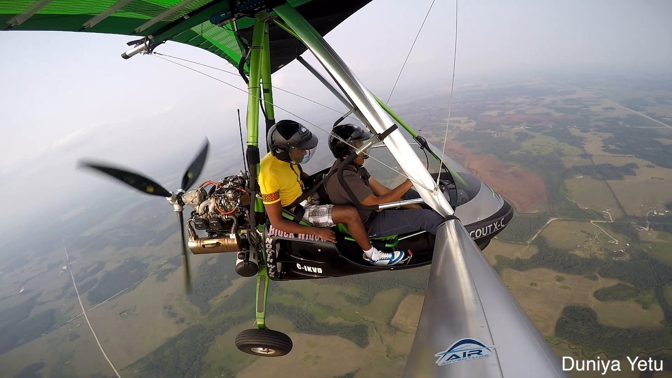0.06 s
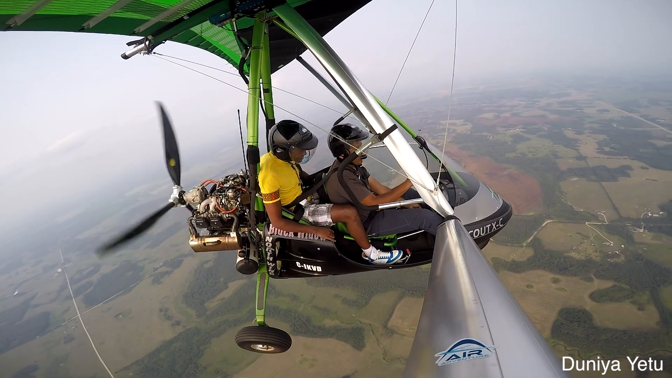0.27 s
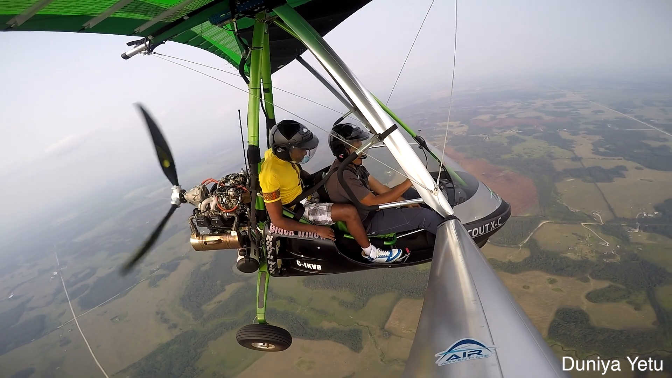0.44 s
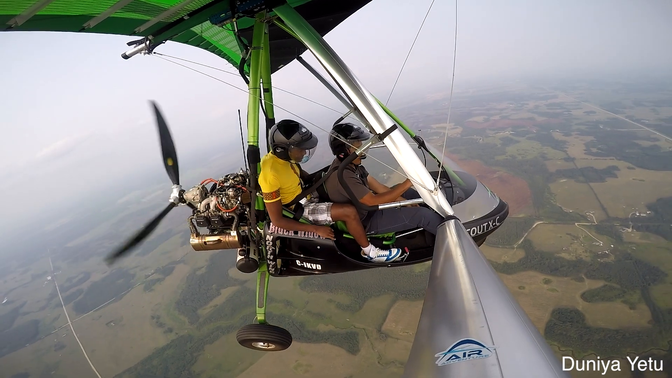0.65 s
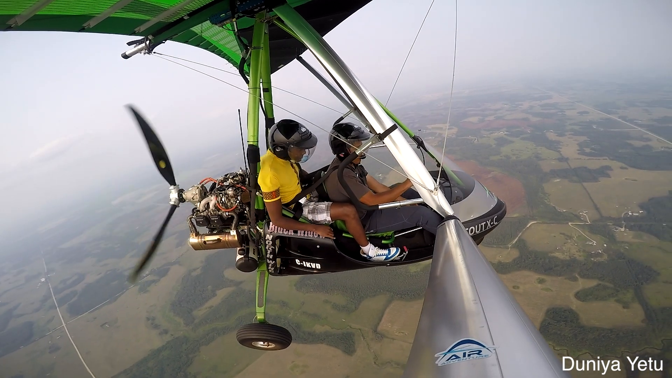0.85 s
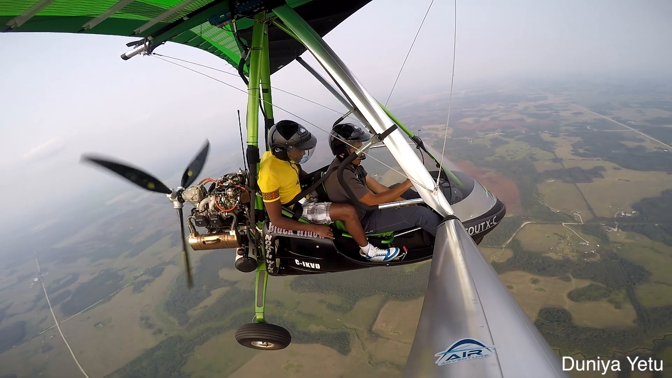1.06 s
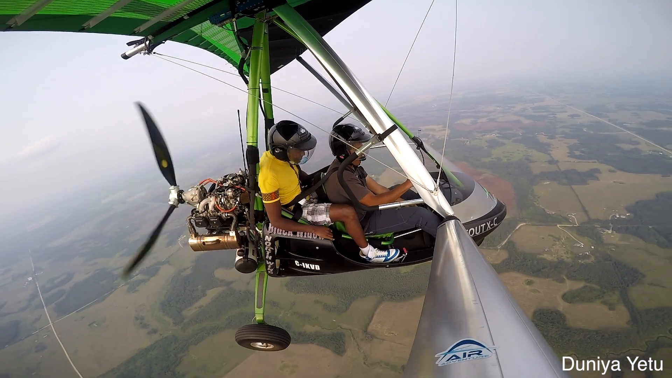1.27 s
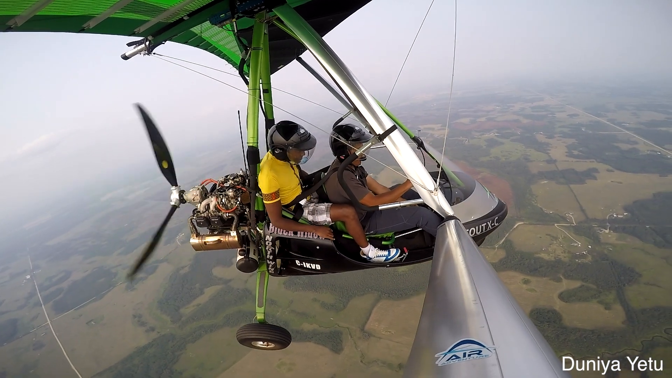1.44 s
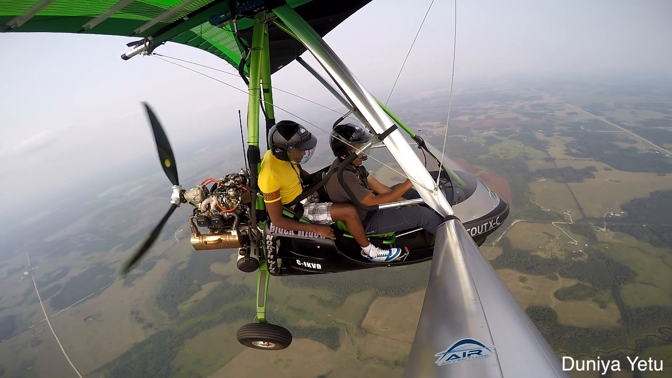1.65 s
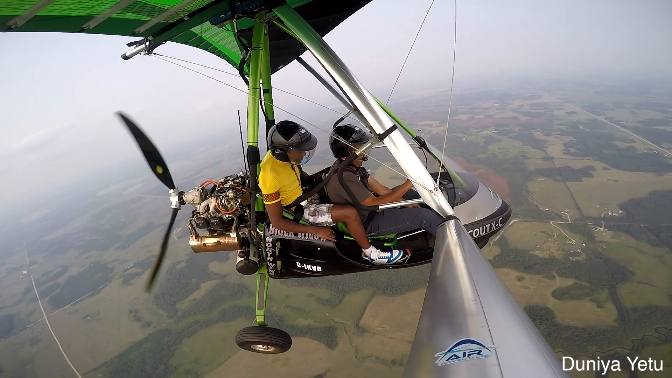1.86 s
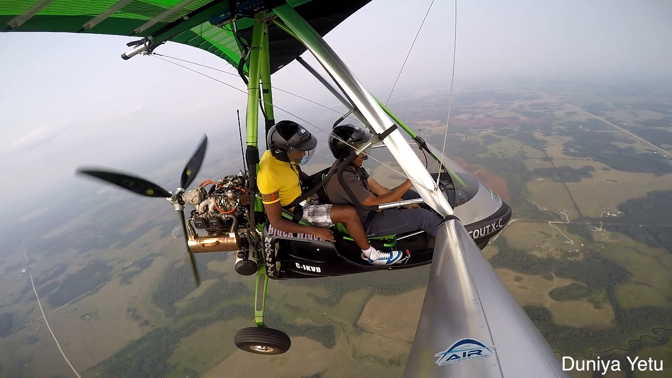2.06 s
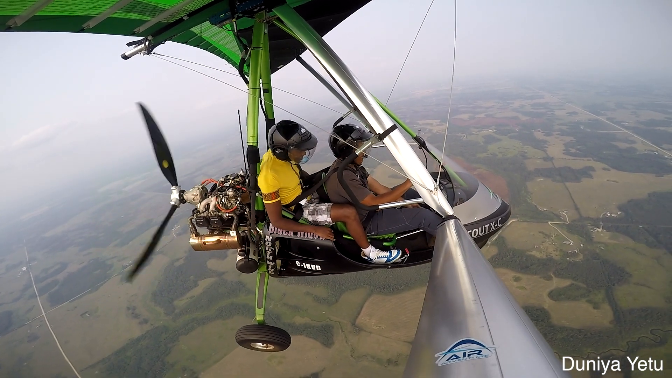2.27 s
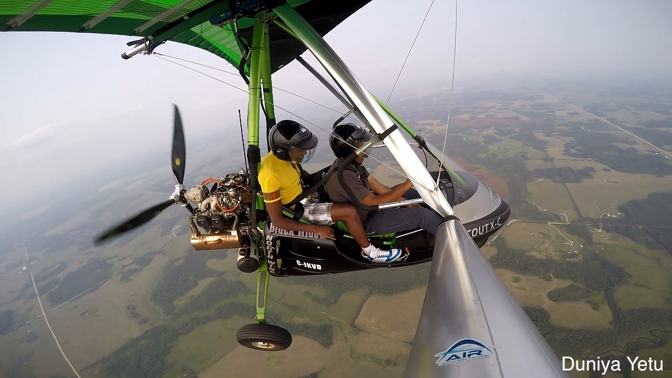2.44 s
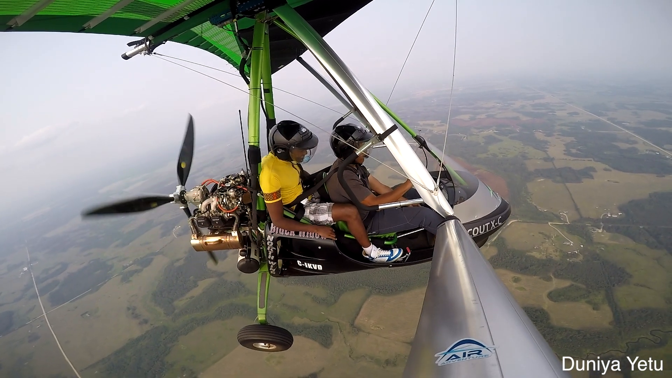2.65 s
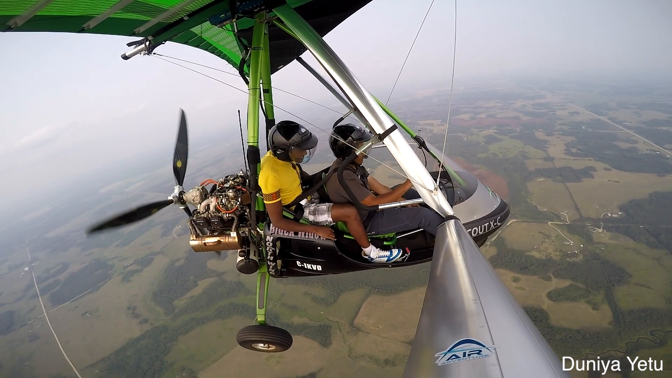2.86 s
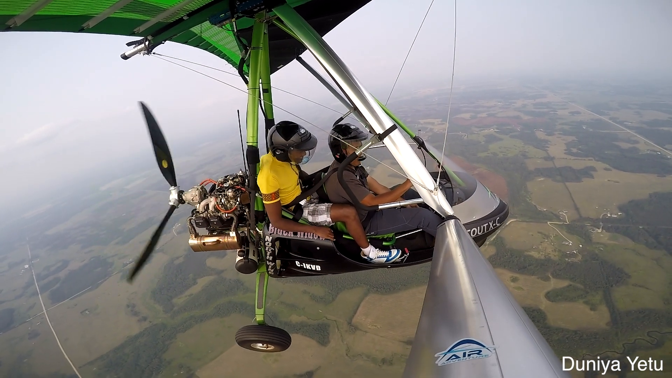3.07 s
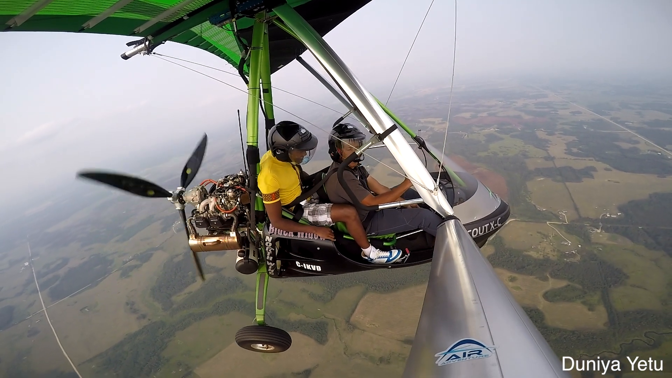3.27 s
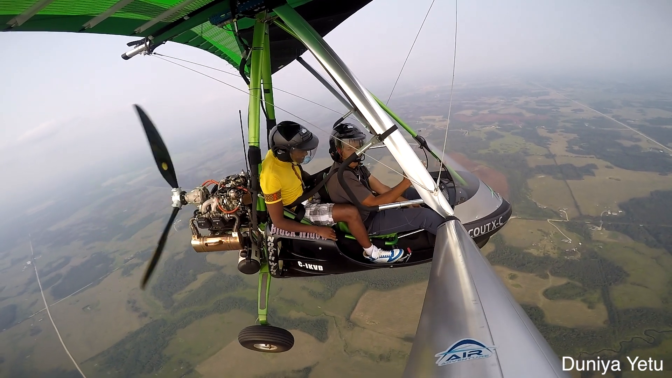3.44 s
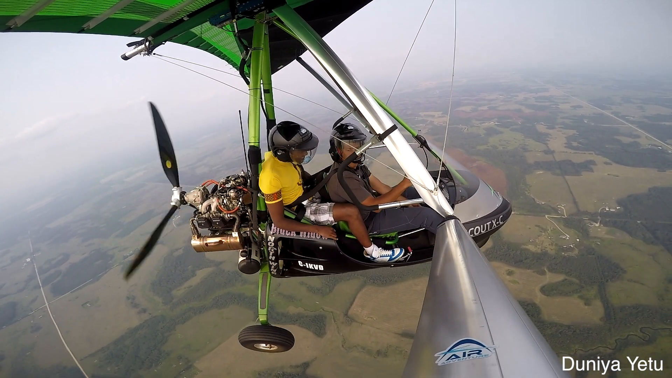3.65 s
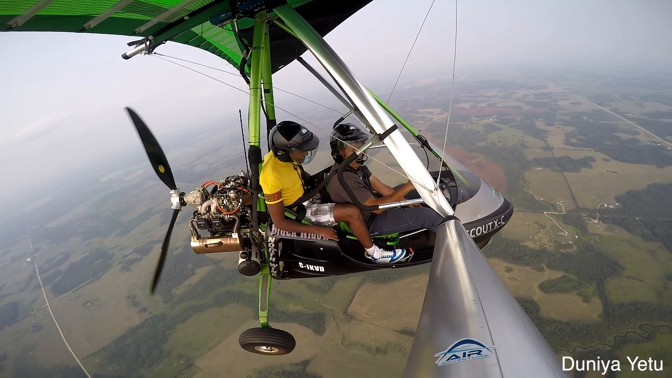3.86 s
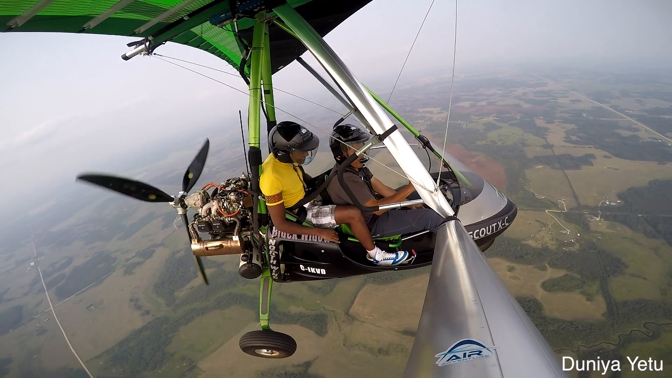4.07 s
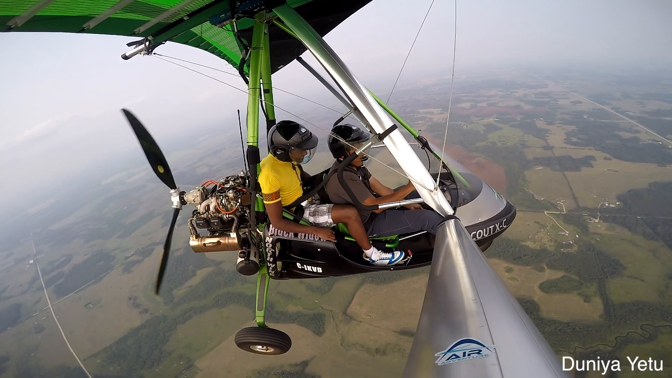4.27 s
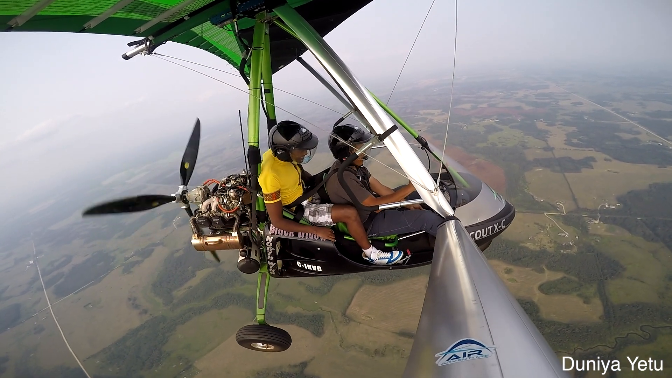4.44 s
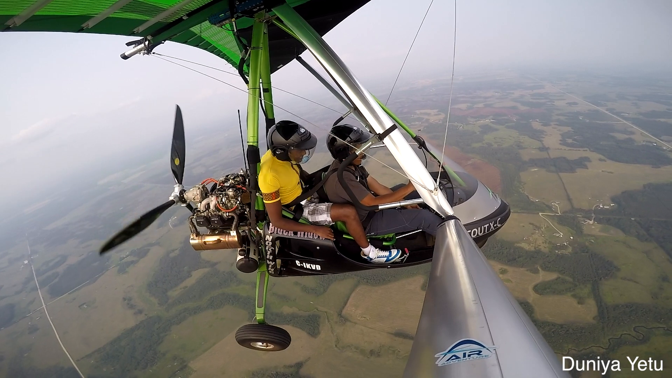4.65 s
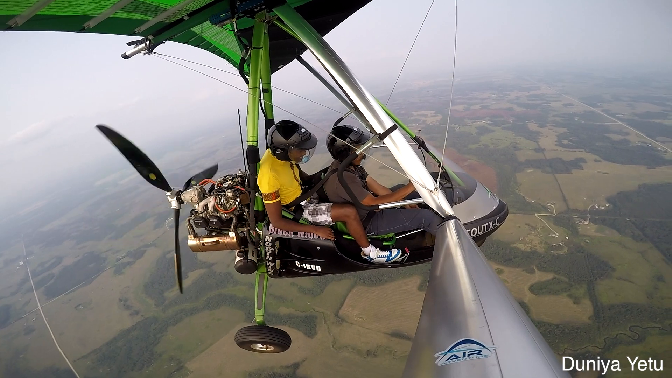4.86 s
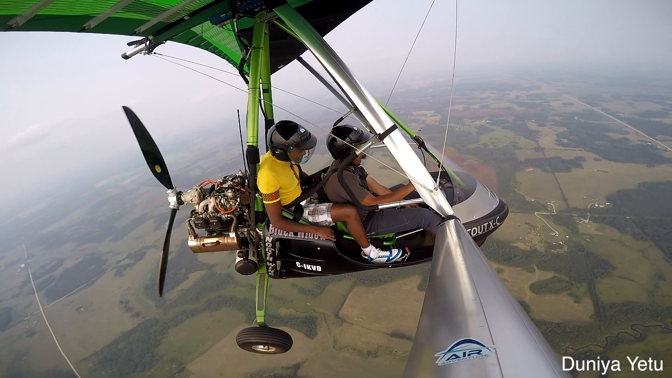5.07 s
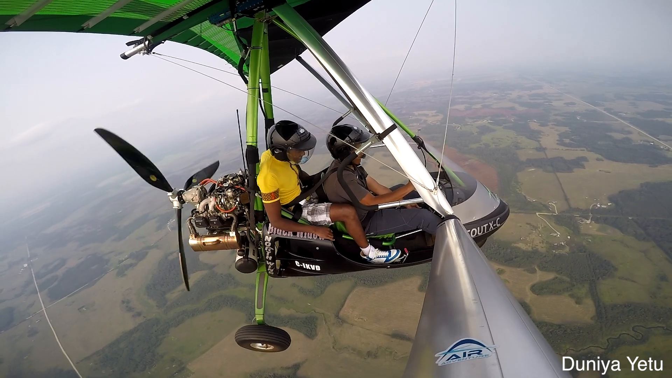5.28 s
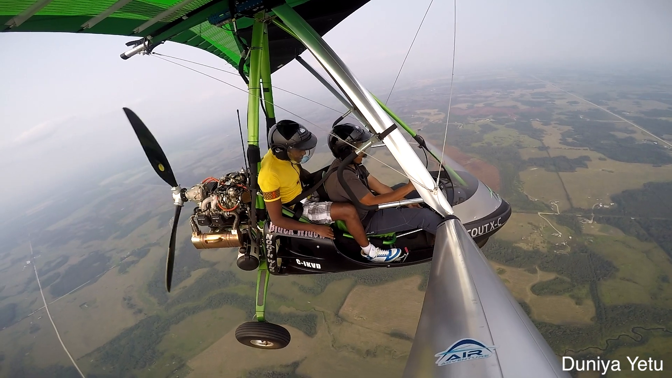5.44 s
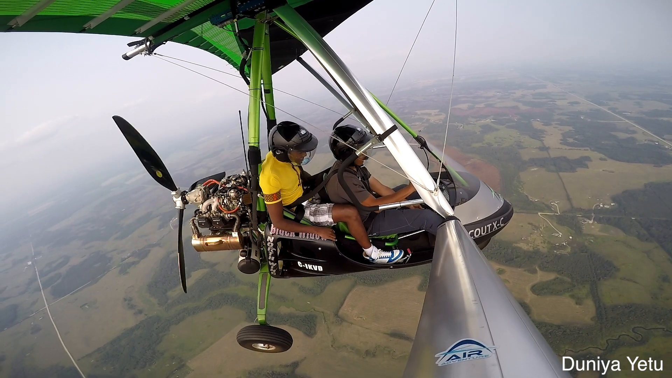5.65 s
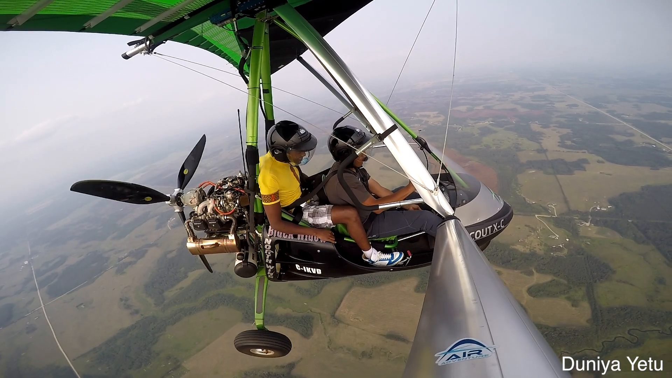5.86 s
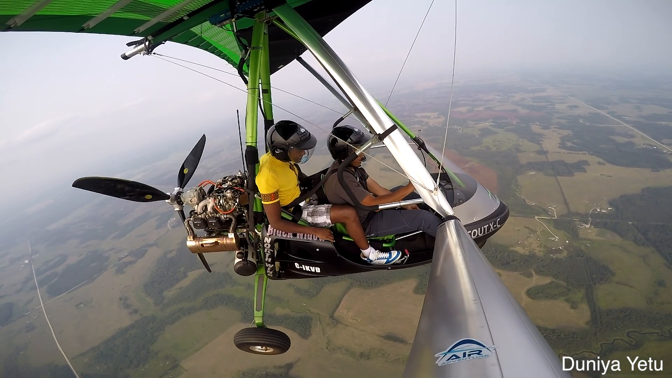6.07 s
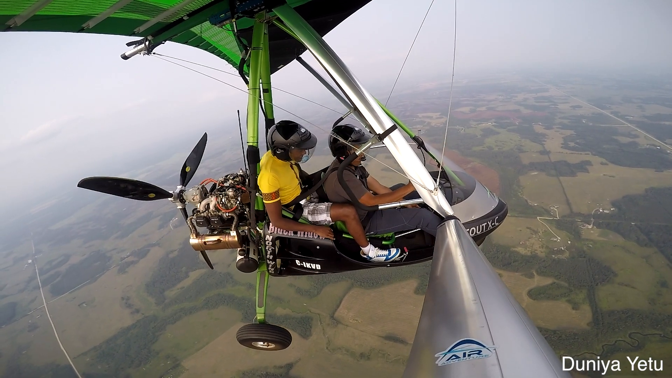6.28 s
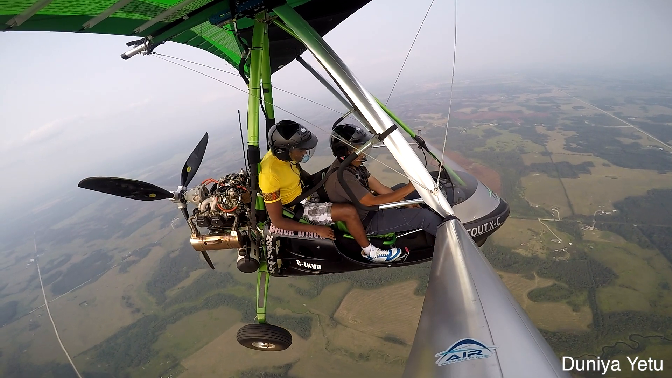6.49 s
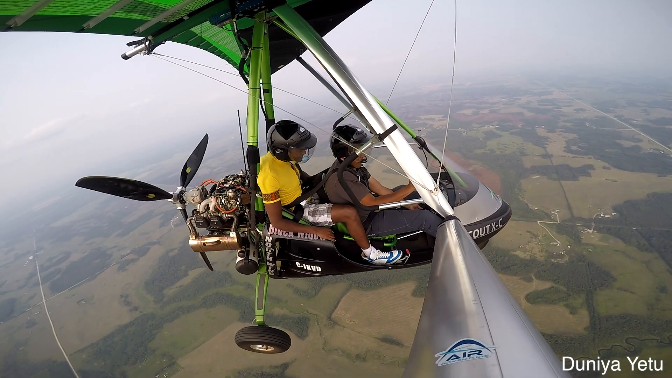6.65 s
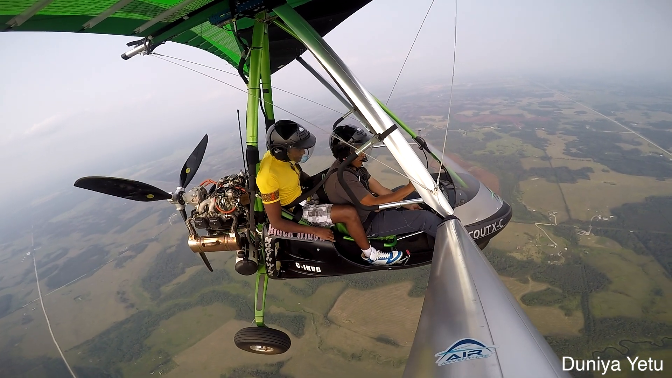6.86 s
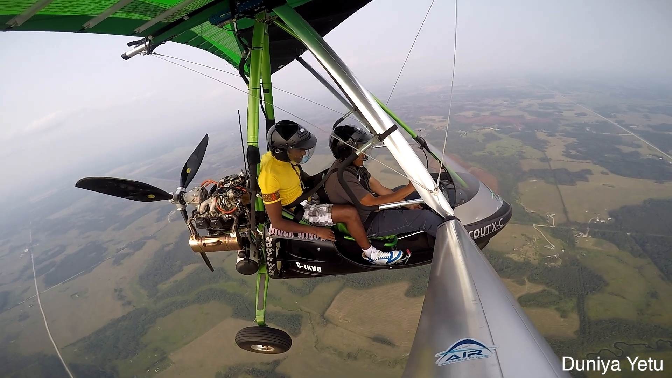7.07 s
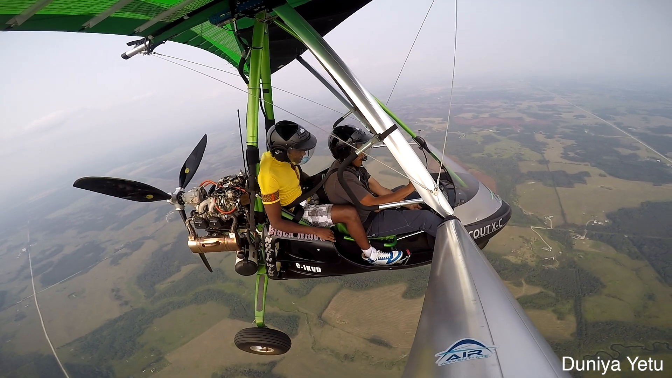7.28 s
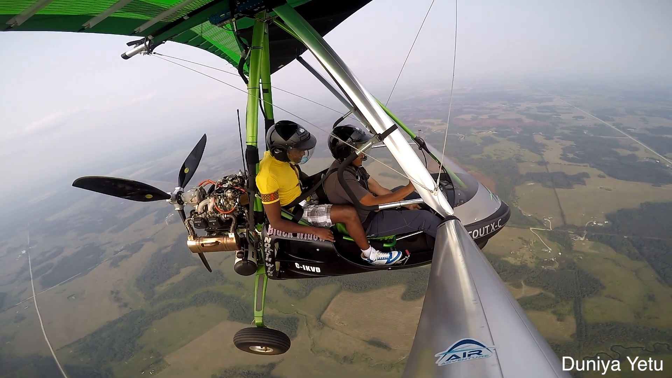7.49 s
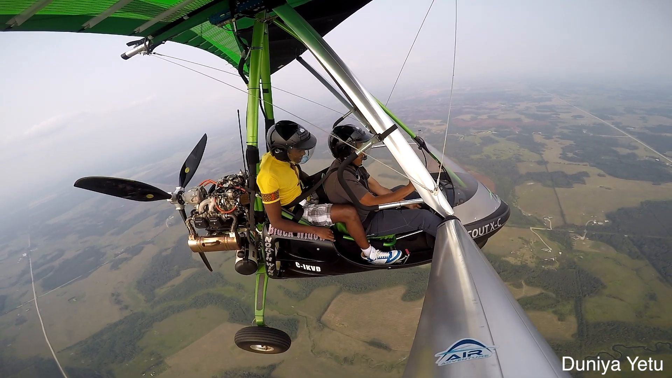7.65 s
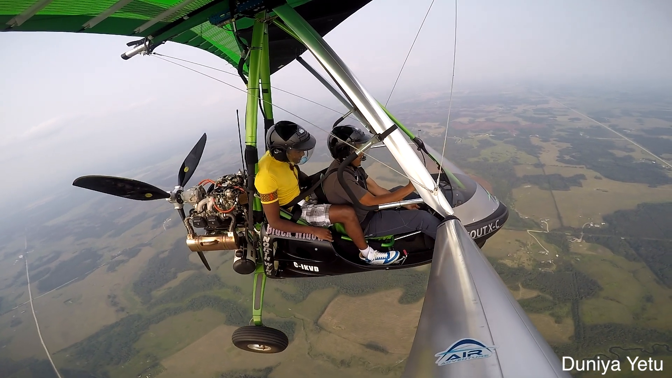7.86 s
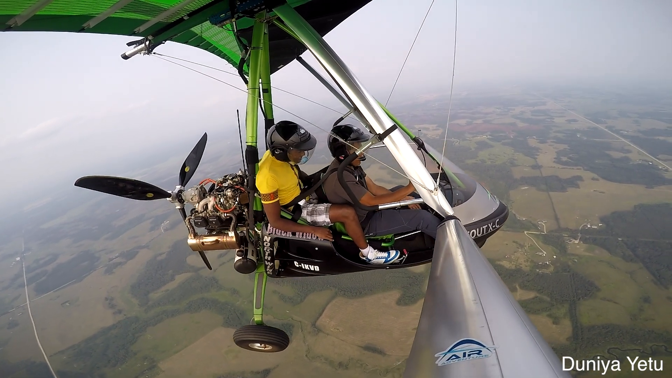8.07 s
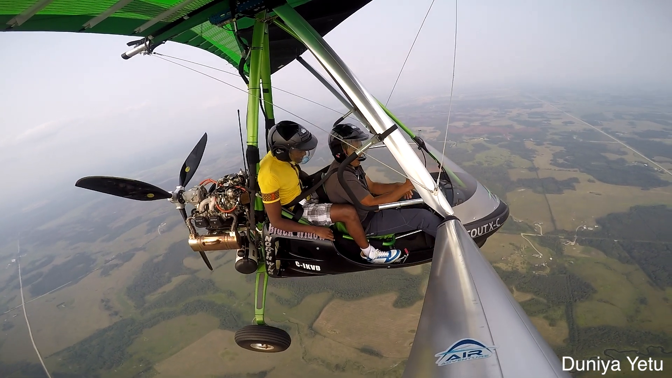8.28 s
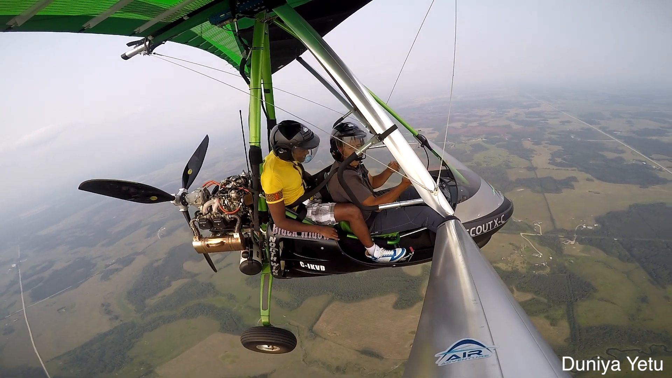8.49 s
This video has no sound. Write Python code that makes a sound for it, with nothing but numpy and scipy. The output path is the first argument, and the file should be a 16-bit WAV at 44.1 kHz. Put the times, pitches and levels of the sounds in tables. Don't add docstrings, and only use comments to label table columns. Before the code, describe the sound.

Airy rushing wind and a bassy, wavering engine drone on an ultralight, with a loose part knocking on the microphone case, busiest around the middle.

```python
import sys
import numpy as np
from scipy import signal
from scipy.io import wavfile

SR = 44100
rng = np.random.default_rng(int(sys.argv[2]) if len(sys.argv) > 2 else 0)


def to_wav(s):
    ch = np.atleast_2d(s).T
    pcm = np.round(np.clip(ch, -1, 1) * 32767)
    wavfile.write(sys.argv[1], SR, pcm.astype(np.int16))


def undo_db(level):
    steps = np.asarray(level, float) / 20
    return 10 ** steps


N = 375732


def rms_one(x):
    return x / np.sqrt(np.mean(x ** 2) + 1e-20)


def in_time(rows):
    s, *columns = np.transpose(rows)
    t = np.arange(N) / SR
    return [np.interp(t, s, column) for column in columns]


def drift(rate_hz):
    every = 40
    r = np.exp(-2 * np.pi * rate_hz * every / SR)
    noise = rng.standard_normal(N // every + 2002)
    slow = signal.lfilter([1], [1, -2 * r, r * r], noise)[2000:]
    return np.interp(np.arange(N) / every, np.arange(len(slow)), rms_one(slow))


def resonance(x, hz, width_hz):
    r = np.exp(-np.pi * width_hz / SR)
    zeros = np.array([1, 0, -1]) * (1 - r * r) / 2
    poles = [1, -2 * r * np.cos(2 * np.pi * hz / SR), r * r]
    return signal.lfilter(zeros, poles, x)


def double_resonance(x, hz, width_hz):
    return resonance(resonance(x, hz, width_hz), hz, width_hz)


def butter(x, hz, kind, order):
    return signal.sosfilt(signal.butter(order, hz, kind, fs=SR, output="sos"), x)


def run_in(shape):
    return rms_one(shape(rng.standard_normal(N + SR))[SR:])


def hiss(level_db, gust_db=0.29, patchy_db=0.23):
    # pitch_hz, density_db [dB per Hz]
    spectrum = [(180, -30), (300, 0), (331, -5.5), (499, -10.5), (858, -4), (1120, -6.5), (1250, -1),
                (2010, -3.5), (2540, -1.5), (3820, -5), (5050, -22), (6680, -18.5), (7870, -26.5),
                (11500, -28.5), (15200, -47)]
    # pitch_hz, width_hz, lift_db
    cavities = [(667, 183, 5), (876.4, 20, 8), (1128, 6.2, 2.5), (1244, 43, 1), (2422, 150, 4),
                (2562, 98, 4.5), (2916, 225, 3.5), (3900, 150, 7), (4170, 200, -2.5), (4770, 170, 3),
                (5470, 310, 6), (6620, 570, 10), (3160, 140, 1.5), (4600, 120, -0.5), (7800, 280, -7),
                (8400, 400, 2.5), (9700, 400, -4.5), (10540, 600, 4), (11900, 300, 1), (12500, 500, -5),
                (13400, 500, 7.5)]
    table_hz, table_db = np.transpose(spectrum)
    together_db = gust_db * (drift(5.0) + .7 * drift(25))
    edges_hz = 300 * 2 ** (np.arange(18) / 3)
    white = rng.standard_normal((2, N))
    out = 0
    for k, (low, high) in enumerate(zip(edges_hz, edges_hz[1:])):
        band_db = np.interp(np.log(low * high) / 2, np.log(table_hz), table_db)
        band = butter(white[k % 2], [low, high], "band", order=2)
        out = out + undo_db(band_db + together_db + patchy_db * drift(6.0)) * band
    for hz, width_hz, lift_db in cavities:
        out = out + (undo_db(lift_db) - 1) * resonance(out, hz, width_hz)
    return undo_db(level_db) * out / np.std(butter(out, [1500, 4000], "band", order=4))


def rumble(level_db, lumpy_db=1.0):
    # pitch_hz, width_hz, mode_db
    frame = [(126.2, 11.4, -7), (136.7, 16.6, -3.5), (166.5, 19.4, -5), (182.2, 24, -7.5), (229.9, 17, -6),
             (249, 59, -12.5), (285.5, 31, -13)]
    top_hz, bed_db = 296.3, -16
    out = undo_db(bed_db) * run_in(lambda w: butter(w, [100, top_hz], "band", order=2))
    for hz, width_hz, mode_db in frame:
        shaken = run_in(lambda w: double_resonance(w, hz, 1.47 * width_hz))
        out = out + undo_db(mode_db + lumpy_db * drift(2.6)) * shaken
    return undo_db(level_db) * rms_one(butter(out, top_hz, "low", order=16))


def drone(hz, level_db, waver_hz=4.0, uneven_db=3.0):
    turns = np.cumsum(hz + waver_hz * drift(6.9)) / SR
    return np.sqrt(2) * undo_db(level_db + uneven_db * drift(3.2)) * np.sin(2 * np.pi * turns)


def beats(fade_s=.1, uneven_db=1.5):
    # start_s, end_s, first_hz, last_hz, level_db
    glides = [(0.15, 1.9, 36.6, 28.5, -12.5), (1.6, 4.0, 30.3, 23.8, -17.5), (1.9, 3.7, 42.2, 31.2, -17.5),
              (3.4, 4.45, 33.2, 22.7, -12.5), (4.35, 4.95, 23.1, 19.8, -15), (0.0, 0.95, 57.2, 48.6, -27),
              (1.9, 3.5, 56.8, 41.0, -29), (1.1, 2.6, 95.0, 76.0, -33), (2.9, 4.4, 70.0, 49.5, -31),
              (4.65, 5.5, 41.4, 27.0, -17), (5.1, 6.05, 19.7, 29.2, -13.5), (5.8, 6.3, 29.0, 29.0, -20),
              (6.25, 6.9, 25.0, 25.8, -18), (6.75, 7.8, 26.0, 28.5, -18.5), (7.55, 8.8, 28.5, 24.0, -21),
              (7.1, 8.1, 54.8, 62.7, -31)]
    ends_db, flatness = -10, 3.0
    out, t = np.zeros(N), np.arange(N) / SR
    for (start, end, first_hz, last_hz, level_db), turn in zip(glides, rng.random(len(glides))):
        along = np.clip((t - start) / (end - start), 0, 1)
        hz = first_hz + (last_hz - first_hz) * along
        swell_db = ends_db * np.abs(2 * along - 1) ** flatness + uneven_db * drift(3.4)
        fade = np.clip(np.minimum(t - start, end - t) / fade_s, 0, 1)
        tone = np.sin(2 * np.pi * (np.cumsum(hz) / SR + turn))
        out += np.sqrt(2) * fade * undo_db(level_db + swell_db) * tone
    return out


def taps(spread_db=1.0):
    # start_s, blow_db, ping_db [over blow], snap_db [over blow]
    hits = [(0.9423, -27, -2, -5), (0.9854, -28, 1, 2), (1.037, -26, -7, -6), (1.2296, -30, -4, -2),
            (1.494, -23, -8, -3), (1.5513, -31, 8, 4), (2.9015, -24, -13, -14), (3.255, -21, -8, -5),
            (3.7249, -27, -4, -6), (3.7858, -22, -13, -7), (3.8292, -24, -9, -8), (4.0372, -22, -11, -14),
            (4.0806, -28, -1, -7), (4.5407, -28, 0.5, -5), (4.5939, -36, 7, 3), (4.6302, -28, -2, -5),
            (4.7436, -24, -12, -6), (4.796, -16, -6, 1.5), (4.844, -25, 0.5, 4), (4.8988, -15, -3, -1),
            (4.9482, -18, -1, 1.5), (4.9957, -23, -12, -5), (5.0402, -36, 2, 3), (5.0903, -30, -7, -2),
            (5.1437, -26, 0.5, 1.5), (5.3013, -18, 2, -6), (5.5194, -23, -15, -3), (5.6408, -15, 2, -2),
            (7.1584, -23, -9, -15), (7.8945, -26, 4, 3)]
    # delay_s, level_db
    chatter = [
        (.0002, 0),
        (.0013, -5),
        (.0027, -3),
        (.0042, -9),
    ]
    # pitch_hz, level_db, t60_s
    case = [
        [(590, -4, .025), (715, 0, .033), (860, -4, .025)],
        [(1035, 0, .038), (1330, -3, .035)],
        [(1700, -6, .03), (2120, 0, .035), (2550, -4, .03), (3160, -4, .028), (3500, -6, .025),
         (4050, -6, .025)],
        [(4460, 0, .023)],
        [(5130, 1, .018), (5680, 0, .017), (6050, -3, .014), (7800, -6, .008), (9500, -9, .006),
         (12500, -10, .005), (14800, -7, .005)],
    ]
    radiation_db = [11, 7, 4.8, 10.3, 5.7]

    s, hit_db, ping_db, snap_db = np.transpose(hits)
    body_db = 4 + 0.45 * snap_db
    blows_db = hit_db + np.array([0 * s, 0 * s, body_db, ping_db, snap_db])
    delay_s, weaker_db = np.transpose(chatter)
    late_s = delay_s * rng.uniform(.9, 1.1, (len(s), len(chatter)))
    at = ((s[:, None] + late_s) * SR).astype(int)
    out, sign = np.zeros(N), 1
    for blow_db, family_db, family in zip(blows_db, radiation_db, case):
        for hz, mode_db, t60_s in family:
            r = undo_db(-60 / (t60_s * SR))
            w = 2 * np.pi * hz / SR
            contacts = undo_db(weaker_db + spread_db * rng.standard_normal(at.shape))
            summed = np.abs(np.sum(contacts * np.exp(-1j * w * at), axis=1))
            gain = undo_db(blow_db + family_db + mode_db) / np.maximum(summed, .9)
            clicks = np.full(N, 1e-18)
            np.add.at(clicks, at, contacts * gain[:, None])
            sign = -sign
            out += sign * signal.lfilter([0, np.sin(w)], [1, -2 * r * np.cos(w), r * r], clicks)
    out = butter(out, 6300, "low", order=3)
    return butter(out, 450, "high", order=3)


def buffet(level_db, lumpy_db=1.0):
    thump = run_in(lambda w: butter(w, (44, 118), "band", order=2))
    return undo_db(level_db + lumpy_db * drift(6.4)) * thump


def clamp(level_db):
    shudder = run_in(lambda w: double_resonance(w, hz=25.9, width_hz=19))
    return undo_db(np.minimum(level_db, -20)) * shudder


def scene():
    # start_s, flow_db, gustiness_db
    airflow = [(0.0, -21.5, 8), (0.71, -21, -1), (1.26, -25.5, -4.5), (1.73, -25, -2.5),
               (2.44, -21.5, -4.5), (3.89, -23, 3.5), (4.1, -25, -5), (4.39, -26.5, 1.5), (4.53, -25, 3.5),
               (5.77, -25, 3), (6.74, -20, 2), (7.28, -19.5, 2), (7.47, -19, 1), (8.52, -19.5, 3)]
    # start_s, firing_hz, load_db
    engine_run = [(0.0, 133.9, -16.5), (0.5, 135, -18.5), (0.9, 143, -20.5), (1.5, 136.2, -24.5),
                  (2.1, 140, -18), (2.6, 137, -18.5), (3.4, 144.2, -19.5), (3.9, 132.1, -19),
                  (4.4, 139.1, -23), (5.0, 133, -20), (5.9, 132.3, -21.5), (6.4, 149.2, -16),
                  (6.9, 141, -15), (7.4, 138.3, -16.5), (7.7, 142.8, -16), (8.52, 137.5, -13)]
    flow_db, gust_db = in_time(airflow)
    firing_hz, load_db = in_time(engine_run)
    wind = hiss(flow_db) + buffet(-33 + gust_db) + clamp(-25 + .8 * gust_db)
    engine = rumble(load_db - 0.7) + drone(firing_hz, load_db - 7.5) + beats()
    return (wind + engine + taps())[None]


def limiter(x, limit_db=-1, release_db_per_s=200):
    over_db = np.maximum(20 * np.log10(np.abs(x) + 1e-9) - limit_db, 0)
    ramp_db = release_db_per_s * np.arange(N) / SR
    held_db = np.maximum.accumulate(over_db + ramp_db, axis=-1) - ramp_db
    return x * undo_db(-signal.lfilter([.01], [1, -.99], held_db))


def low_pass(x):
    return signal.sosfilt(signal.butter(12, 15330, fs=SR, output="sos"), x)


def record(dry):
    x = limiter(butter(dry, 16, "high", order=3))
    overload = .9
    x = x / (1 + (x / overload) ** 4) ** .25
    return low_pass(butter(x, 15450, "low", order=16))


dry = scene()
out = record(dry)
to_wav(out)
```